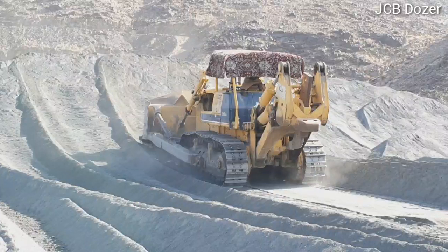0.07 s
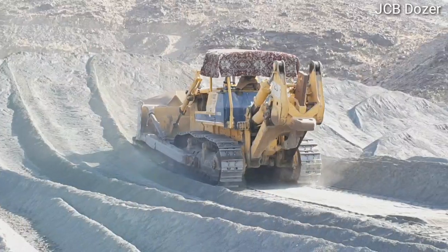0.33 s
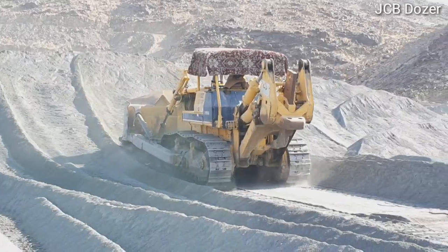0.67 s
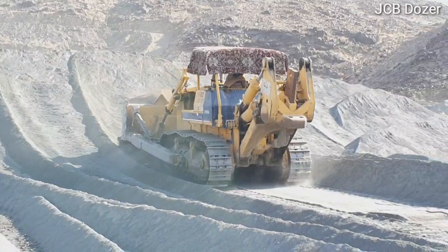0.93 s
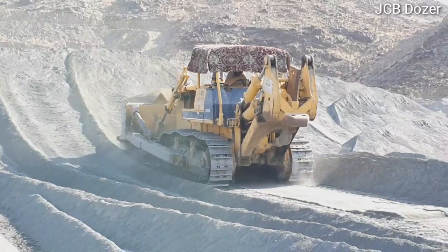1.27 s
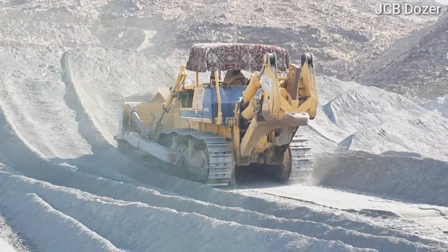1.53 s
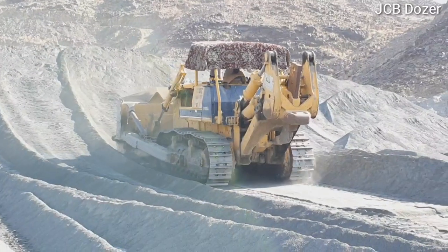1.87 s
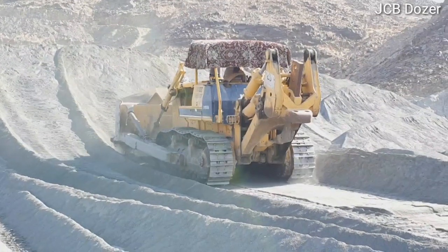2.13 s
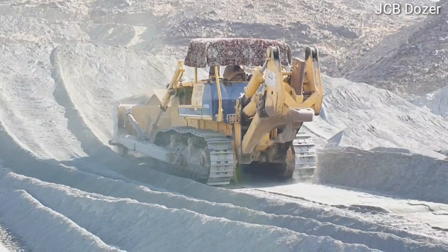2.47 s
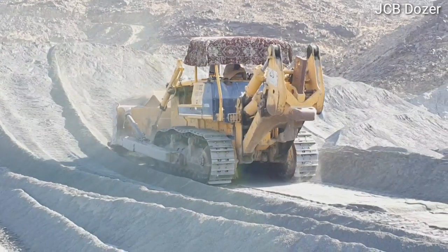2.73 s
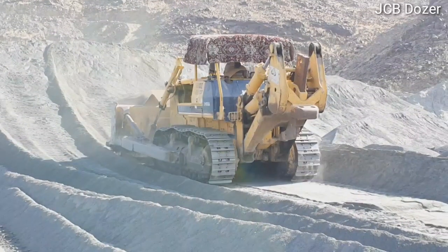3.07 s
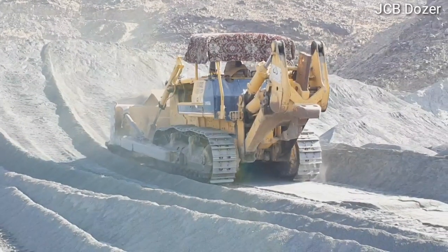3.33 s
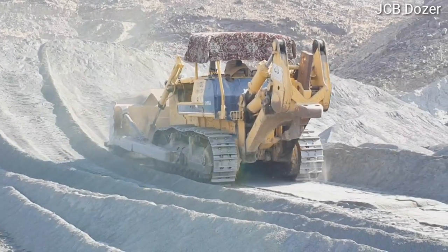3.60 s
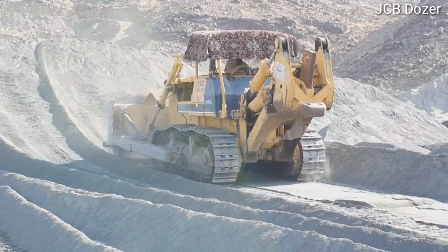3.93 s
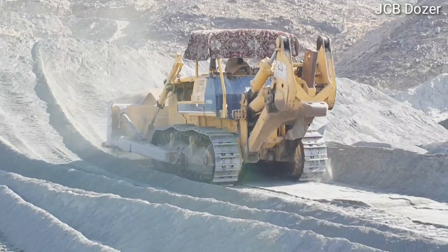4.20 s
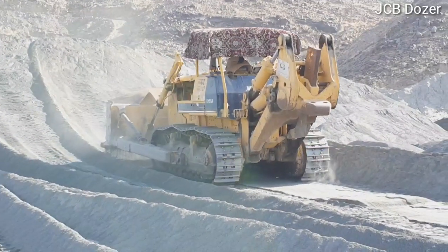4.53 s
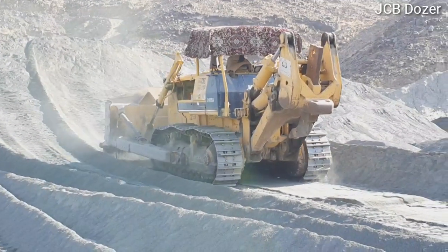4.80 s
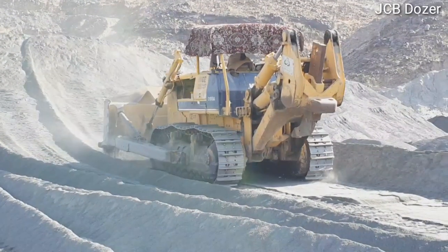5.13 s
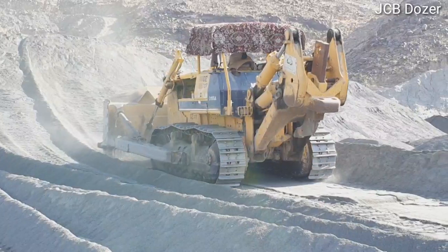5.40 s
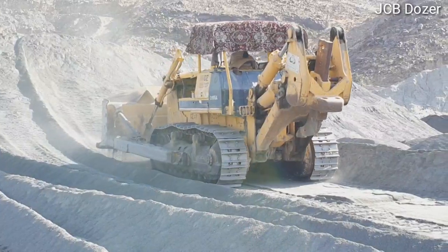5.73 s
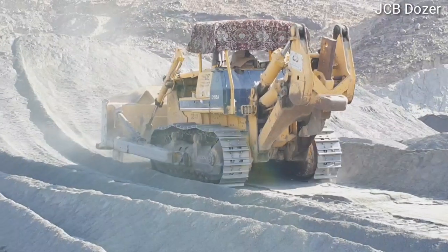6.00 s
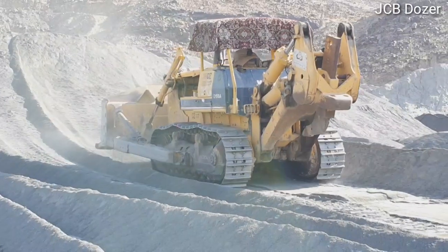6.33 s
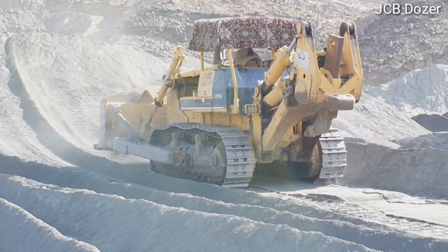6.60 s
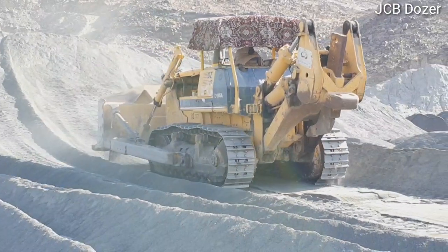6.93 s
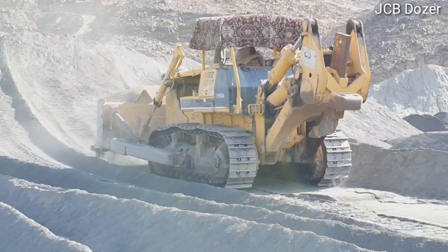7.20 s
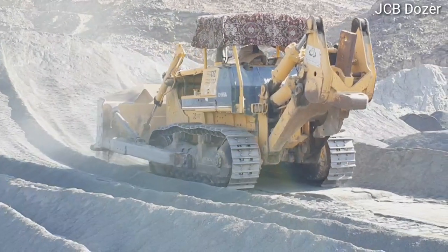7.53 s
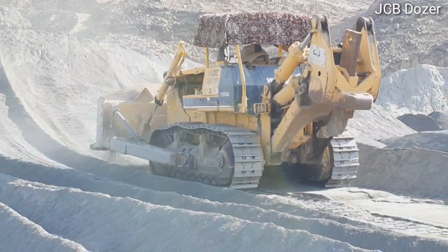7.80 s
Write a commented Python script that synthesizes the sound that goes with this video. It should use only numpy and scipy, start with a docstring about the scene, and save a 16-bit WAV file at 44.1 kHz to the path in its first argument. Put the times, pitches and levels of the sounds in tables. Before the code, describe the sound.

A bulldozer's diesel engine runs for the whole eight seconds as the machine reverses slowly closer across a quarry floor. The deep, centred drone pulses about ten times a second and creeps up slightly in pitch, under exhaust roar and a metal clatter that gradually grows a little louder. From the start, the steel tracks crunch grit in uneven swells, roughly three or four a second, with a thin metallic ring and dusty hiss. Links clank irregularly on the rollers, more strongly from about 2.9 to 3.9 seconds, around 5 to 5.5, and from 6.4 onward. Very short, high, dry squeaks are scattered throughout. A faint gear whine rises just after 2 seconds and again from about 5.7. Between 7.2 and 8 seconds, scrapes, squeaks and clanks come thickest, while the engine carries on steadily.

```python
"""A bulldozer's six-cylinder diesel drones as the machine reverses slowly closer over a dusty quarry floor.
The exhaust note beats against the fan hum ten times a second, over stack roar and metal clatter.
The dry tracks grind in swells as shoe after shoe rolls round, crushes grit and rings with it.
Links clank on the rollers, dry steel sticks and slips in squeaks, and a faint gear whine comes and goes."""
import sys
import numpy as np
from scipy import signal
from scipy.fft import rfft, irfft, next_fast_len
from scipy.io import wavfile

SR = 44100
rng = np.random.default_rng(int(sys.argv[2]) if len(sys.argv) > 2 else 0)


def dump(signal):
    """Clip the signal to [-1, 1] and save it as 16-bit WAV at the path in sys.argv[1]."""
    limited = np.clip(np.atleast_2d(signal).T, -1, 1)
    pcm = np.round(limited * 32767).astype(np.int16)
    wavfile.write(sys.argv[1], SR, pcm)


N = 355446
T = np.arange(N) / SR
HZ = np.fft.rfftfreq(N, 1 / SR)
FAN_PER_FIRING = 1.1632  # fan pitch over firing rate

# firing rate, creeping up: t/s, f/Hz
FIRING_RATE = [(0.0, 60.7), (0.5, 61.25), (2.0, 62.2), (4.0, 62.96), (6.0, 63.1), (8.06, 63.65)]
# exhaust overtones: multiple of the six-cylinder cycle, level/dB against the firing tone
EXHAUST_ORDERS = [(3, -37), (4, -24), (5, -18.5), (8, -24), (9, -27), (12, -24), (13, -29), (14, -28),
                  (15, -29), (16, -24), (17, -23), (18, -15.5), (22, -35), (24, -32), (28, -33)]
# fader ride on those overtones: t/s, level/dB
OVERTONE_RIDE = [(0, -1), (1.2, -2), (2.2, 0.5), (2.75, 1.5), (3.55, 0.5), (3.85, 3.5), (4.1, 1), (5.2, 2),
                 (6.5, 2.5), (7.0, 0), (8.06, 0.5)]
# punch of each cylinder in firing order: level/dB
CYLINDER_PUNCH = [-4.5, -1, -7, -0.5, -0.5, 1]
# EQ of the stack roar: f/Hz, level/dB
ROAR_EQ = [(18, -19), (32, -38), (45, -1.5), (90, 2), (130, -4.5), (170, -3), (215, -5), (270, -10),
           (340, -10), (430, -22), (700, -27), (2000, -82)]
# EQ of the metal clatter: f/Hz, level/dB
CLATTER_EQ = [(250, -15.5), (380, -8), (480, -8), (620, 1.5), (790, 2), (980, -7.5), (1230, -3), (1400, -4),
              (1650, -12.5), (2700, -13.5), (3100, -18), (4000, -11.5), (5200, -27.5), (7200, -32),
              (8000, -39.5), (11600, -33), (14900, -66)]
# EQ of the crunching grit: f/Hz, level/dB
GRIT_EQ = [(820, -35), (1500, -12), (2050, 0.5), (2440, -7), (2700, 1), (3150, -3.5), (3950, 3),
           (5100, -4.5), (7250, -8), (7900, -19.5), (9540, -16), (12100, -19), (13300, -34), (14900, -31)]
# low bed of grinding under the swells: t/s, level/dB
CREEP_BED = [(0, -37), (.6, -37), (.87, -40), (1.1, -40.5), (1.7, -38), (2.13, -44), (2.4, -41), (3.6, -42),
             (5.4, -42.5), (5.67, -43), (6.0, -39.5), (6.8, -36), (6.98, -40.5), (7.15, -39), (8.06, -41)]
# a shoe rolls round and crushes grit: t/s, length/s, level/dB, dust hiss offset/dB
SHOE_SWELLS = [(0.024, 0.24, -31, -11), (.18, 0.34, -41.5, -9), (0.368, 0.14, -28.5, -5),
               (0.466, 0.12, -34, -3), (0.672, 0.22, -34.5, -5), (0.914, 0.22, -31, -1),
               (1.047, 0.19, -36.5, -9), (1.239, 0.22, -31, -0.5), (1.594, 0.2, -32, -3),
               (1.813, 0.25, -45, -10), (1.937, 0.18, -30.5, -3), (2.186, 0.24, -29.5, 0.5),
               (2.495, 0.25, -30.5, 2.5), (2.796, 0.25, -30.5, 1.5), (3.197, .18, -32.3, -3),
               (3.48, 0.31, -38.5, -6), (3.725, 0.32, -34, -4), (4.081, 0.12, -31, -5),
               (4.175, 0.13, -28, -1), (4.363, 0.18, -40.5, 3), (4.442, 0.23, -34, -1),
               (4.673, 0.14, -39, 2), (4.792, 0.19, -29.5, -1), (5.17, 0.094, -28, -1),
               (5.282, 0.23, -34.5, 6.5), (5.479, 0.15, -28.5, 2), (5.716, 0.25, -33, 2.5),
               (6.036, .26, -33, 0.5), (6.332, 0.33, -36.5, -2), (6.653, 0.22, -36, -2),
               (7.02, 0.25, -37.5, 0.5), (7.27, 0.15, -36.5, 4), (7.48, 0.4, -37, -3), (7.71, 0.52, -42, 5)]
# a shoe skids on stone: t/s, length/s, level/dB, dust hiss offset/dB
SHOE_SKIDS = [(.705, 0.034, -31, 0), (1.505, 0.029, -43, 6), (1.725, 0.023, -37, 0), (2.39, 0.025, -34, -2),
              (2.815, 0.044, -39, 11), (3.044, 0.039, -33, 0), (3.8, 0.036, -37.5, 11),
              (4.605, 0.038, -34.5, 1), (5.148, 0.037, -33, -3), (5.305, 0.069, -35.5, 9),
              (5.58, 0.029, -33.5, 0), (5.865, 0.015, -39, -2), (6.29, 0.031, -33, -8),
              (6.869, 0.025, -33, 0), (7.246, 0.03, -29, -6), (7.508, .022, -31.5, -6),
              (7.555, .026, -36, -4), (7.604, .028, -33, -12), (7.682, 0.017, -34, -4),
              (7.724, 0.024, -32, -3), (7.749, 0.026, -32.5, 2), (7.8, 0.034, -34, 5),
              (7.863, 0.047, -31.5, -2)]
# resonances of the track shoes: f/Hz, width/Hz, level/dB, scatter from shoe to shoe/Hz
SHOE_MODES = [(2283, 70, -17, 110), (2700, 80, -17, 70), (4000, 80, -9.5, 140), (4560, 55, -12.5, 150),
              (5315, 20, -11, 10), (6400, 30, -16, 350), (7150, 90, -16, 110), (7490, 50, -20, 40),
              (9535, 30, -19, 10), (11350, 90, -28, 40), (11820, 25, -22.5, 5), (12200, 30, -28, 10)]
# links drop on the rollers: t/s, level/dB, t60/s, crack offset/dB, link pitch f/Hz
LINK_DROPS = [(0.073, -29, 0.22, -12, 1260), (0.365, -27, 0.18, -14, 1250), (1.015, -32, .11, -14, 1213),
              (1.72, -29.5, 0.23, -10, 1263), (2.915, -23, 0.25, -14, 786), (3.31, -25, .062, -13, 800),
              (3.528, -22.5, 0.11, -2, 1280), (3.537, -20.5, 0.12, -2.5, 786), (3.552, -31, .13, -14, 1430),
              (3.659, -32.5, 0.082, 8, 800), (3.853, -23, 0.13, -20, 752), (4.603, -27.5, 0.13, -17, 1160),
              (5.09, -24.5, 0.11, -11, 1265), (5.092, -23.5, .12, -17, 716), (5.385, -28, .16, -14, 1246),
              (5.536, -24, 0.11, -17, 720), (6.391, -25.5, 0.12, -17, 770), (6.481, -28, 0.12, -1, 720),
              (6.597, -23, 0.058, -7, 760), (7.06, -27, 0.092, -6, 1400), (7.062, -21, 0.17, -17, 810),
              (7.371, -21, 0.22, -12, 751), (7.704, -24.5, 0.43, -7, 724), (7.792, -27, .06, -12, 750),
              (8.047, -25.5, 0.15, -2, 790)]
# resonances of the track frame: f/Hz, width/Hz, level/dB
FRAME_MODES = [(663, 85, 8), (781.5, 8.2, 3.5), (1233, 50, 6), (1400, 16, 2), (1980, 130, -2),
               (2710, 81, -7), (3800, 40, -19), (4350, 100, -10)]
# EQ of a link's crack: f/Hz, level/dB
CRACK_EQ = [(500, -18), (1300, -2.5), (2700, 0.5), (3200, -7), (3800, 2), (4600, -1), (5200, -14),
            (8000, -21)]
# steel sticks and slips: t/s, length/s, f/Hz, level/dB
STEEL_SQUEAKS = [(0.206, 0.03, 2734, -27), (.21, 0.028, 5450, -36), (.21, .025, 7080, -42),
                 (0.24, .025, 4800, -36), (0.281, 0.052, 2720, -31.5), (0.57, 0.039, 11283, -40),
                 (0.706, .025, 4050, -33), (0.708, .035, 7360, -40), (0.711, 0.035, 9689, -46),
                 (1.05, 0.03, 7600, -45), (1.38, 0.018, 9520, -47), (1.376, 0.032, 2283, -40),
                 (1.698, 0.045, 5270, -40), (1.725, 0.019, 5650, -37), (2.198, 0.06, 9550, -45),
                 (2.33, 0.05, 5305, -42), (2.455, 0.046, 10852, -47), (2.53, .035, 6632, -42),
                 (2.63, 0.03, 6029, -41), (2.82, 0.032, 11835, -43), (2.88, 0.068, 11805, -45),
                 (2.927, 0.066, 2560, -36.5), (2.944, 0.03, 784, -34), (3.048, 0.018, 5180, -42),
                 (3.243, 0.034, 5480, -37), (3.257, 0.028, 4110, -31), (3.267, 0.025, 6800, -34.5),
                 (3.858, 0.065, 4060, -36), (4.053, 0.02, 5330, -33.5), (4.207, .03, 6891, -43),
                 (4.208, .03, 7192, -44), (4.21, .04, 13178, -53), (4.264, .04, 4651, -40),
                 (4.775, 0.022, 5082, -39), (4.871, 0.042, 7100, -37), (5.38, .08, 12370, -50),
                 (5.432, .04, 1983, -40), (5.492, .025, 7270, -43), (5.54, 0.037, 4420, -33),
                 (5.815, 0.036, 2670, -35), (5.857, 0.03, 6960, -36), (5.864, 0.017, 1981, -34.5),
                 (6.09, .035, 10853, -46), (6.412, 0.035, 5375, -40), (6.78, .03, 7321, -45),
                 (6.866, 0.016, 7250, -37), (7.246, 0.027, 7100, -35.5), (7.493, 0.025, 5728, -39),
                 (7.552, 0.018, 4608, -32), (7.555, 0.074, 771, -27.5), (7.578, 0.1, 3835, -34),
                 (7.606, .022, 4550, -37), (7.728, .02, 4620, -37), (7.804, 0.016, 4750, -28.5),
                 (7.863, 0.038, 7120, -40), (7.866, .028, 6680, -41), (7.805, 0.093, 11370, -45),
                 (7.862, 0.026, 4680, -32.5)]
# gear mesh tones: multiple of the firing rate, level/dB
GEAR_MESHES = [(13.03, 0), (19.12, -5)]
# fader ride on the gear whine: t/s, level/dB
WHINE_RIDE = [(0, -50), (1.9, -48), (2.25, -36.5), (2.5, -43), (5.4, -48), (5.7, -37.5), (6.1, -44),
              (6.5, -37.5), (7.2, -41.5), (8.06, -43)]
# stereo image: f/Hz, likeness of the sides (0-1), left lead/rad, left minus right/dB
STEREO_IMAGE = [(90, .999, 0, 3), (218, 0.99, 0, -1), (725, 0.89, 0.1, -.5), (1150, 0.84, 0.32, 1),
                (2880, 0.84, 0.58, 1), (4250, 0.82, 0.57, -3.5), (6230, 0.44, 0.84, -4),
                (7400, 0.9, 0.9, -5.5), (7660, 0.9, 9.5, -19), (9200, 0.8, 4, -5.5), (12000, 0.8, 4.5, -6),
                (14000, 0.6, 3, -28)]


def drone(firings):
    """The firing tone beats against the fan hum; unequal cylinders add overtones of the engine cycle."""
    exhaust = np.cos(2 * np.pi * firings)
    ride_db, pulsing = curve(OVERTONE_RIDE), throb(firings, depth=.45)
    for order, db in EXHAUST_ORDERS:
        offset = rng.random() * (order % 6 > 0)  # harmonics of the firing tone peak together with it
        tone = np.cos(2 * np.pi * (order * firings / 6 + offset))
        gain = amp(db + ride_db + .87 * wander(1.8))
        exhaust += gain * tone * (pulsing if order in (16, 17, 18) else 1)
    fan = np.cos(2 * np.pi * FAN_PER_FIRING * firings)
    swing = np.cos(2 * np.pi * (T - .42) / 3.68)  # the fan swells slowly and the exhaust ducks a little
    hum = amp(-19.8 - .6 * swing) * exhaust + amp(-24.4 + 3.2 * swing) * fan
    return np.sqrt(2) * amp(.05 * T) * hum  # louder as the machine nears


def throb(firings, depth):
    """One swell per beat of exhaust and fan, peaking a third of a beat early."""
    return unit(1 + depth * np.cos(2 * np.pi * ((FAN_PER_FIRING - 1) * firings + .34)))


def puffs(firings, depth):
    """A surge at each firing, as strong as its cylinder."""
    cylinder = np.floor(firings).astype(int) % 6
    surge = amp(CYLINDER_PUNCH)[cylinder] * np.sin(np.pi * (firings % 1)) ** 2
    return 1 - depth + depth * unit(surge)


def roar_and_clatter(firings):
    """Gas roars from the stack and metal clatters, both pulsing with the firings."""
    gas = rng.standard_normal(N) * puffs(firings, depth=.32)
    roar = colour(gas, ROAR_EQ) * throb(firings, depth=.12)
    knocks = grains(per_s=320, click_share=.24) * puffs(firings, depth=.034)
    clatter = colour(knocks * amp(1.15 * wander(19.6)), CLATTER_EQ)
    return amp(-29) * roar + amp(-33.5 + .29 * T) * clatter  # the clatter grows as the machine nears


def tracks(force, dust):
    """Grit crunches, chirps and squeals between steel parts; fine dust hisses on top."""
    crush = grains(per_s=1800, click_share=.41) * amp(1.93 * wander(70))
    jingle = chirps(per_s=1300, spread_db=2.7, length_s=.034, low_hz=1500, high_hz=14500)
    squeal = chirps(per_s=170, spread_db=1.8, length_s=.065, low_hz=3400, high_hz=7600)
    grit = colour(crush + 1.05 * jingle + .36 * squeal, GRIT_EQ)
    scrape = grit + amp(-7.5) * shoes(crush)
    hiss = signal.sosfiltfilt(signal.butter(4, 8000, "highpass", fs=SR, output="sos"), scrape)
    return amp(-.18) * (force * (scrape - hiss) + dust * hiss)


def track_load():
    """Envelopes for grit and dust: a low creep, a swell as each shoe bears down, and sudden skids."""
    grit = dust = amp(curve(CREEP_BED)) ** 2
    for rows, attack_s, release_s in [(SHOE_SWELLS, .057, .13), (SHOE_SKIDS, .0056, .012)]:
        for s, length, db, dust_db in rows:
            ramp = np.clip(np.minimum((T - s) / attack_s, (s + length - T) / release_s), 0, 1)
            power = (amp(db) * np.sin(np.pi / 2 * ramp)) ** 2
            grit, dust = grit + power, dust + power * amp(dust_db) ** 2
    return np.sqrt([grit, dust]) * amp(.53 * wander(12))  # uneven ground


def chirps(per_s, spread_db, length_s, low_hz, high_hz):
    """Tiny slips of stone on steel, each singing its own pitch; the high ones vary most in level."""
    out = np.zeros(N)
    for when, pitch, size, life, glide in rng.random((int(per_s * N / SR), 5)):
        progress = np.linspace(0, 1, int(length_s * SR * (.5 + life)))
        hz = (low_hz + (high_hz - low_hz) * pitch) * (1 + .008 * (glide - .5) * progress)
        db = spread_db * (min(-np.log(1 - size), 4) - 1) * np.sqrt(pitch)
        envelope = amp(db) * np.sin(np.pi * np.sqrt(progress)) ** 2
        add(out, when * N / SR, envelope * np.sin(2 * np.pi * np.cumsum(hz) / SR))
    return unit(out)


def shoes(crush):
    """The shoe under load rings with the grit; no two shoes are tuned quite alike."""
    parts = np.split(crush, sorted(round(row[0] * SR) for row in SHOE_SWELLS[1:]))
    out = np.zeros(N)
    for hz, width, db, scatter in SHOE_MODES:
        out += np.concatenate([amp(db + 1.5 * rng.normal()) * ring(part, hz + scatter * rng.normal(), width)
                               for part in parts])
    return out


def clanks(attack_s=.0007, crack_t60_s=.052):
    """Each link lands with a crack, rings at its own pitch and shakes the track frame."""
    blows, cracks, links = np.zeros((3, N))
    t = T[:SR // 2]
    attack = 1 - np.exp(-t / attack_s)
    for s, db, t60, crack_db, hz in LINK_DROPS:
        blow = amp(db - 60 * t / t60) * attack
        tone = unit(sustain(ring(rng.standard_normal(len(t)), hz, width_hz=15)))
        add(blows, s, blow)
        add(links, s, blow * tone)
        add(cracks, s, amp(db + crack_db - 60 * t / crack_t60_s) * attack)
    chatter = rng.standard_normal(N)
    frame = unit(sum(amp(db) * sustain(ring(chatter, hz, width)) for hz, width, db in FRAME_MODES))
    hits = amp(-1.5) * links + amp(-5) * blows * frame + cracks * colour(chatter, CRACK_EQ)
    return signal.sosfilt(signal.butter(3, [480, 5000], "bandpass", fs=SR, output="sos"), hits)


def squeaks(attack_s=.0039, tail_s=.0097, settle_s=.03):
    """Dry steel sticks and slips: short squeaks are rough and sag in pitch, long ones sing cleaner."""
    out, waver, flutter = np.zeros(N), wander(170), wander(120)
    for s, length, hz, db in STEEL_SQUEAKS:
        t = T[:int((length + 8 * tail_s) * SR)]
        span = round(s * SR) + np.arange(len(t))
        rough = min(settle_s / length, 1)
        envelope = np.minimum(t / attack_s, 1) * np.exp(-np.maximum(t - length, 0) / tail_s)
        sag = .02 * rough * rng.random() * (np.minimum(t / length, 1) - .5)
        pitch = hz * (1 - sag + .0046 * rough * waver.take(span, mode="wrap"))
        tone = np.sqrt(2) * np.sin(2 * np.pi * np.cumsum(pitch) / SR)
        add(out, s, amp(db + 2 * rough * flutter.take(span, mode="wrap")) * envelope * tone)
    return out


def gears():
    """Meshing teeth in the drive give a faint whine that follows the engine speed."""
    phase = 2 * np.pi * np.cumsum(curve(FIRING_RATE) + .12 * wander(8)) / SR
    whine = sum(amp(db + 1.4 * wander(7.1)) * np.sin(multiple * phase) for multiple, db in GEAR_MESHES)
    return amp(curve(WHINE_RIDE)) * whine


def stereo(near, scattered):
    """Near sound reaches the left a little sooner; scattered sound widens the image."""
    alike, lead = across(STEREO_IMAGE), across(STEREO_IMAGE, column=2)
    pan = amp(across(STEREO_IMAGE, column=3) / 2)
    mid = np.sqrt((1 + alike) / 2) * rfft(near)
    side = np.sqrt((1 - alike) / 2) * rfft(scattered)
    left = (mid + side) * pan * np.exp(.5j * lead)
    right = (mid - side) / pan * np.exp(-.5j * lead)
    mono_gain = np.sqrt(pan ** 2 + pan ** -2 + 2 * alike * np.cos(lead)) / 2
    return irfft(np.array([left, right]) / mono_gain, N)


def amp(db):
    """Decibels to gain."""
    return 10 ** (np.asarray(db) / 20)


def unit(x):
    """Scales to rms 1."""
    return x / np.sqrt(np.mean(x ** 2) + 1e-20)


def curve(rows):
    """A time table at every sample."""
    return np.interp(T, *np.transpose(rows))


def across(rows, column=1):
    """One column of a frequency table at every bin."""
    rows = np.array(rows)
    return np.interp(np.log(HZ + 1), np.log(rows[:, 0] + 1), rows[:, column])


def colour(x, eq):
    """Shapes x with an EQ curve, at rms 1."""
    return unit(irfft(rfft(x) * amp(across(eq)), N))


def wander(per_s):
    """Smooth random drift, at rms 1."""
    knots = np.arange(0, T[-1] + 1, 1 / (8 * per_s))
    drift = np.convolve(rng.standard_normal(len(knots)), np.hanning(9), "same")
    return unit(np.interp(T, knots, drift))


def ring(x, hz, width_hz):
    """One resonance, at rms 1."""
    r = np.exp(-np.pi * width_hz / SR)
    return unit(signal.lfilter([1, 0, -1], [1, -2 * r * np.cos(2 * np.pi * hz / SR), r * r], x))


def sustain(x):
    """Keeps the pitch of a resonance and flattens its level."""
    return np.cos(np.angle(signal.hilbert(x, next_fast_len(len(x)))[:len(x)]))


def grains(per_s, click_share):
    """Clicks of uneven size in a bed of noise."""
    size = amp(np.minimum(rng.exponential(1, N), 4))
    clicks = size * rng.choice([-1, 1], N) * (rng.random(N) < per_s / SR)
    return np.sqrt(click_share) * unit(clicks) + np.sqrt(1 - click_share) * rng.standard_normal(N)


def add(mix, s, sound):
    """Mixes a sound in at time s."""
    part = mix[max(round(s * SR), 0):][:len(sound)]
    part += sound[:len(part)]


def scene():
    """The whole machine: roar and tracks spread wide, the deep drone almost dead centre."""
    firings = np.cumsum(curve(FIRING_RATE)) / SR
    firings -= np.interp(.024, T, firings)  # exhaust and fan first push together at 24 ms
    force, dust = track_load()
    near = roar_and_clatter(firings) + gears() + tracks(force, dust) + clanks() + squeaks()
    scattered = roar_and_clatter(firings) + tracks(force, dust)
    return stereo(near, scattered) + drone(firings) * amp([[-.5], [.5]])


def record(dry):
    """A steep high cut at 15.1 kHz."""
    lowpass = signal.firwin(511, 15100, window=("kaiser", 9), fs=SR)
    return signal.oaconvolve(dry, lowpass[None], "same", axes=1)


dry = scene()
out = record(dry)
dump(out)
```